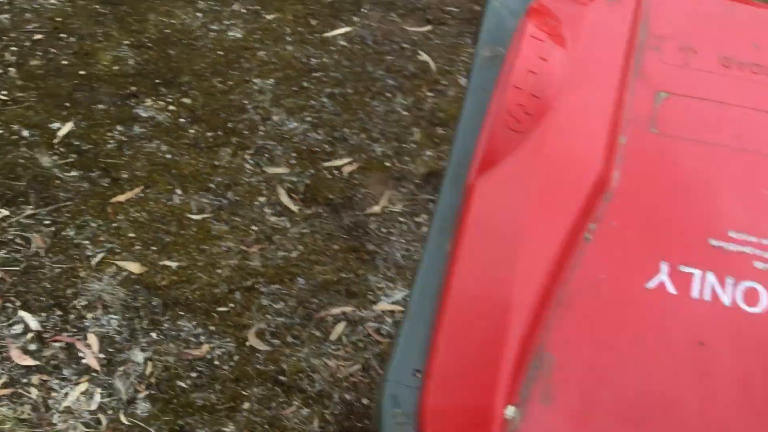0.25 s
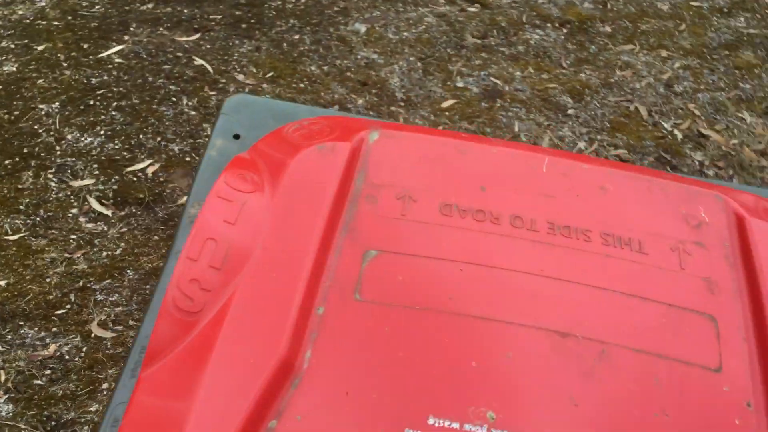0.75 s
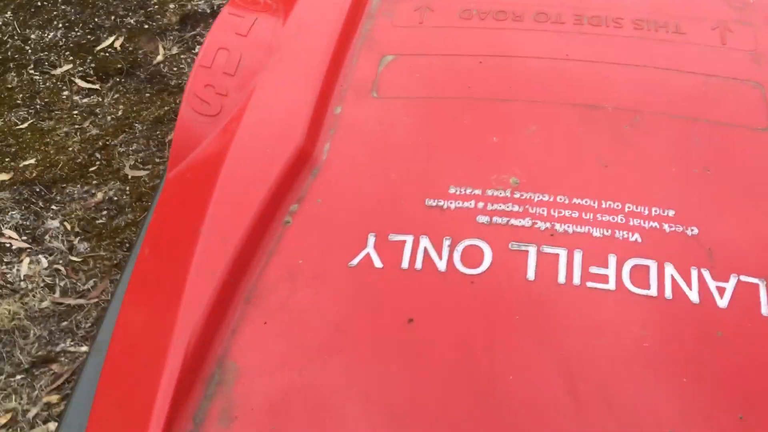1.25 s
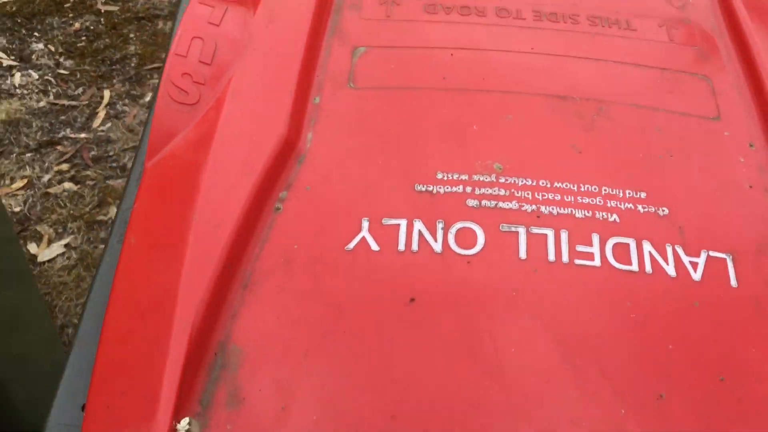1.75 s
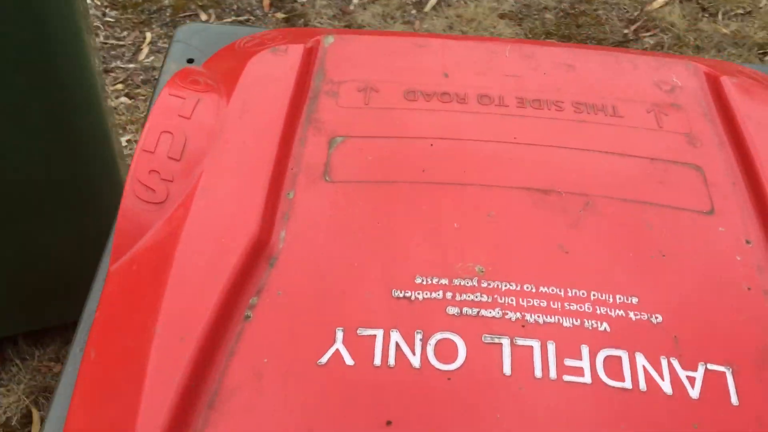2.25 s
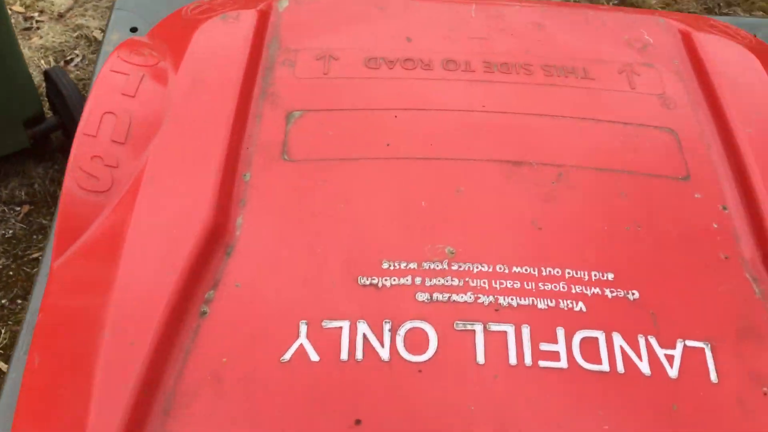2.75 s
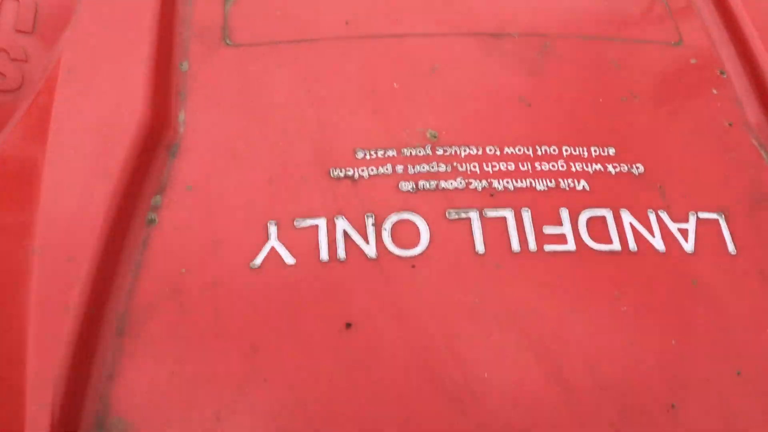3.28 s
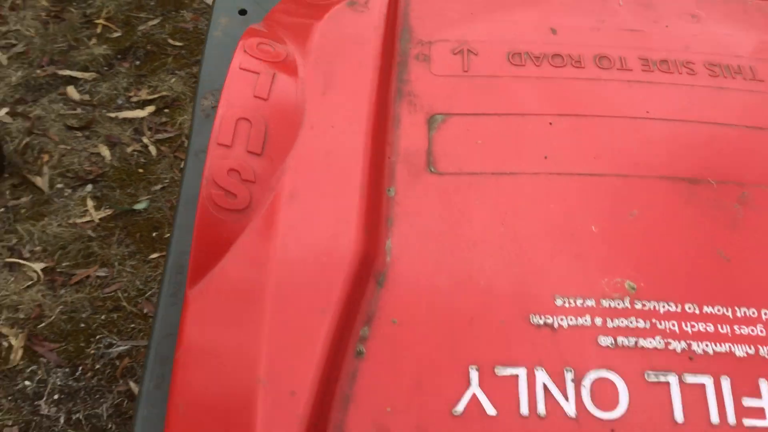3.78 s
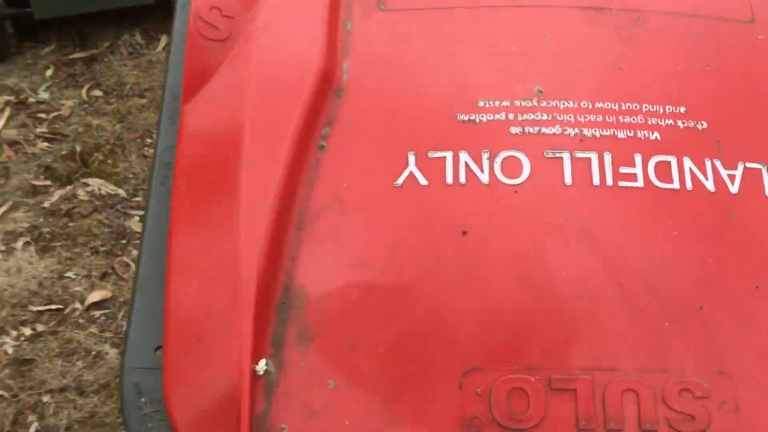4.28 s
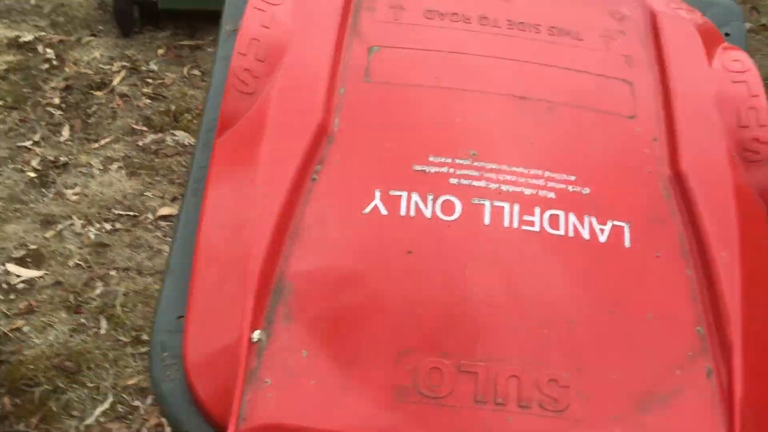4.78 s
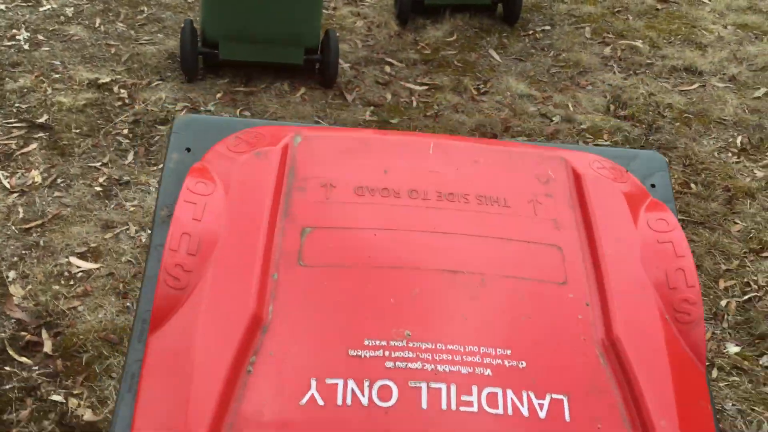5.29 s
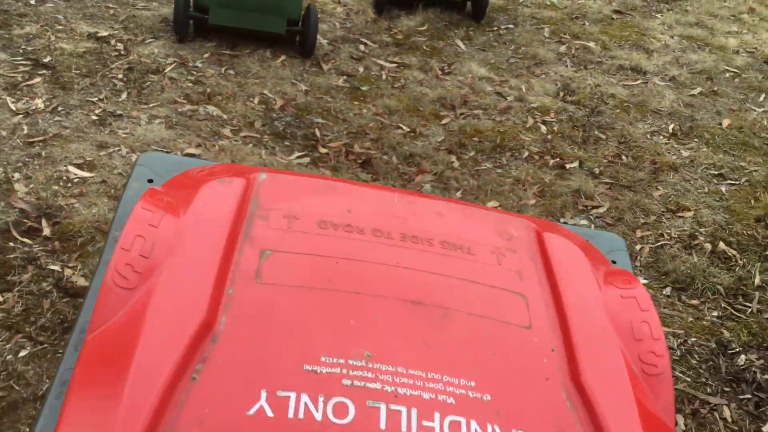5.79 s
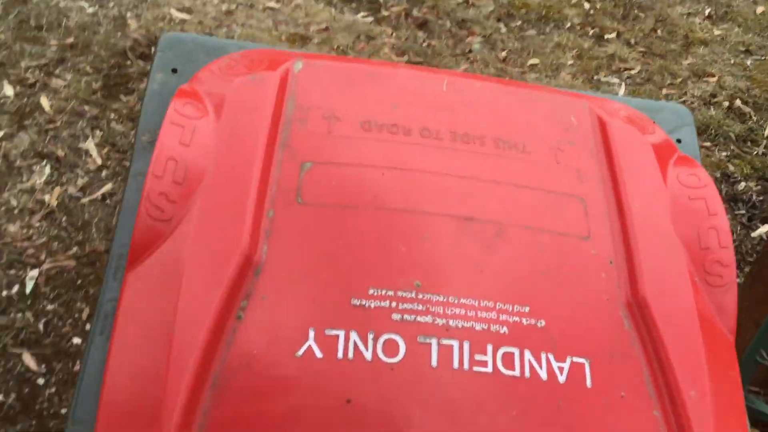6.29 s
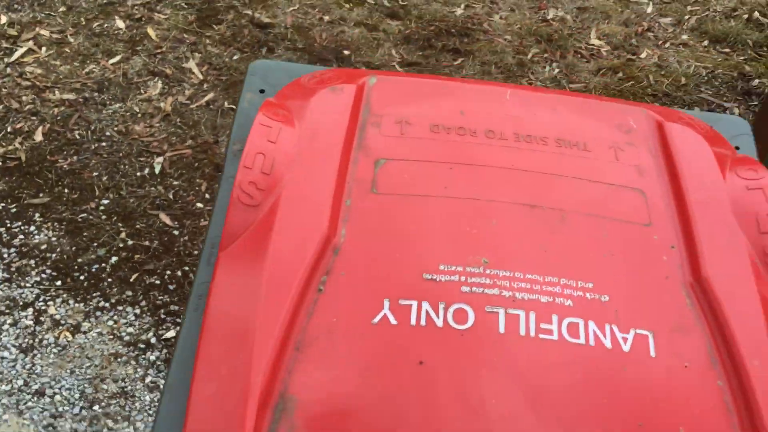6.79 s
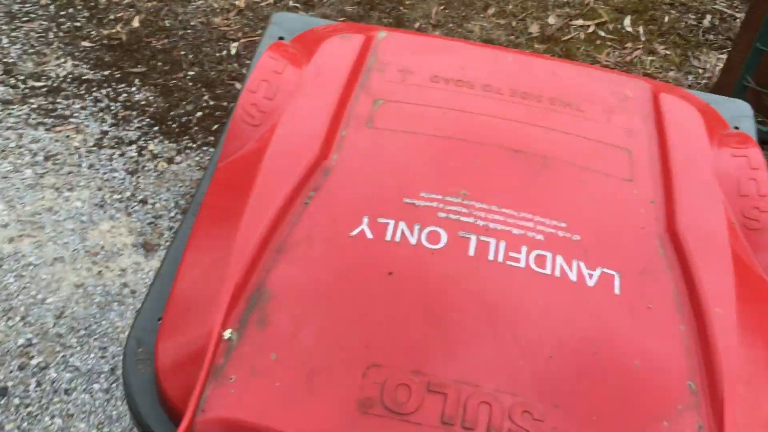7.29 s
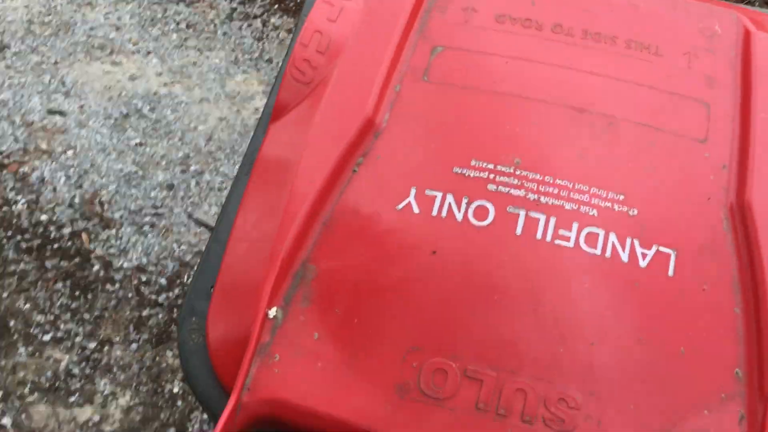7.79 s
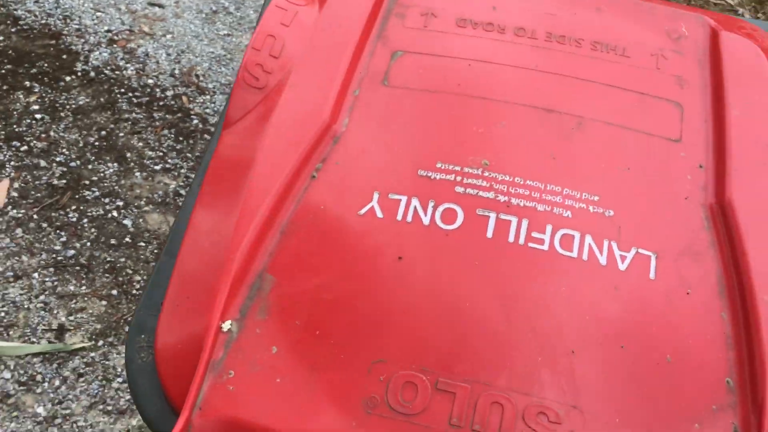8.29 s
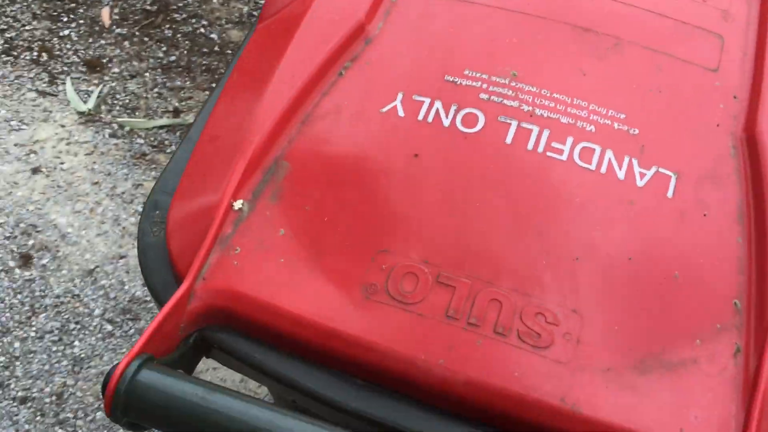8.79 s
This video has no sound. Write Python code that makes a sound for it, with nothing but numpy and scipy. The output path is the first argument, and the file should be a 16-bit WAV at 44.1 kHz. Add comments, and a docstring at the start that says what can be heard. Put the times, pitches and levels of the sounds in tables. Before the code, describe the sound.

A hollow plastic wheelie bin is pulled along outdoors, heard closely from above its lid, dry and without echo over faint low air. From 0 to 1.2 seconds it drums softly over lumpy grass, with irregular low thuds, a muffled rattle and a short leaf crackle. A very loud, sharp knock, like a fast falling chirp, hits at 1.3, followed by others near 2.2, 3.1, 4.0 and 4.3. Jolts cluster from 3.0 to 3.8; then it eases briefly. From about 4.8 the ground hardens: softer double knocks, twig flicks, leaf rustle, and the first crunching stones, one clear near 5.6. From 6.5 to 7.1 comes a heavy, booming, rattling surge with a bright gravel crush at 6.9. A short lull around 7.5 leads into steady gravel crunch, ticking pebbles and hollow booms, with knocks at 8.0, 8.6 and 8.8, still rolling at 9.

```python
"""Hollow drumming and a soft rattle come first: a plastic wheelie bin pulled over lumpy grass, heard from above its lid.
Small random impacts ring the body, panels, walls and wheels; jolts add bursts of them and deep thuds.
Patches of dry leaves crackle, soft low booms swell as wavering tones, and twigs and stones flick the lid.
Sharp knocks on the plastic arrive as very fast falling chirps.
As gravel takes over, the crunch grows, single pebbles tick and clumps of stones give way, over quiet outdoor air."""
import sys
import numpy as np
from scipy import signal
from scipy.fft import rfft, irfft, next_fast_len
from scipy.io import wavfile
from scipy.ndimage import map_coordinates

SR = 44100
rng = np.random.default_rng(int(sys.argv[2]) if len(sys.argv) > 2 else 0)


def generate_wav(sig):
    """Save sig (samples, or channels by samples) to the path in sys.argv[1] as 16-bit PCM at SR."""
    pcm = np.round(np.clip(np.atleast_2d(sig).T, -1, 1) * 32767).astype(np.int16)
    wavfile.write(sys.argv[1], SR, pcm)


N = 399105  # length in samples, about 9 s


def amp(db):
    """Turn decibels into gain."""
    return 10 ** (np.asarray(db) / 20)


def unit(x):
    """Scale x to an rms of 1."""
    return x / np.sqrt(np.mean(x ** 2) + 1e-20)


def along(points, hz):
    """Read a curve of (frequency, value) points on a log frequency axis."""
    point_hz, value = np.transpose(points)
    return np.interp(np.log(hz + 1), np.log(point_hz + 1), value)


def wobble(rate):
    """Draw a smooth random curve with this many knots a second."""
    knots = rng.standard_normal(int(N * rate / SR) + 4)
    return map_coordinates(knots, [np.arange(N) * rate / SR])


def causal(gain):
    """Give a gain curve the phase of an object that rings only after it is struck (minimum phase)."""
    cepstrum = irfft(np.log(np.maximum(gain, 1e-6)))
    half = len(cepstrum) // 2
    # fold the part before time zero onto the part after it
    cepstrum[1:half] *= 2
    cepstrum[half + 1:] = 0
    return np.exp(rfft(cepstrum))


def ring(bed, modes, size=16384):
    """Make an impulse response of energy 1: resonances standing on a smooth bed."""
    hz = np.fft.rfftfreq(size, 1 / SR)
    power = amp(along(bed, hz)) ** 2
    for centre_hz, width_hz, db in modes:
        peak = amp(db) / (1 + ((hz - centre_hz) / width_hz) ** 2)
        power = power + peak ** 2
    response = irfft(causal(np.sqrt(power)))
    return response / np.linalg.norm(response)


def through(drive, response):
    """Let a driving signal ring an object."""
    return signal.fftconvolve(drive, response)[:N]


def contacts(rate, spread_db):
    """Scatter tiny random impacts of uneven size, about rate a second, at rms 1."""
    struck = rng.random(N) < rate / SR
    sizes = amp(spread_db * np.clip(rng.standard_normal(N), -2, 2))
    return unit(struck * sizes * rng.choice([-1, 1], N))


# A wheel drops off a lump or a stone; each layer shifts its own level and scales the settling time.
# Columns: start_s, drumming_db, rattle_db, crunch_db, settling_s (time to fall 60 dB)
JOLTS = [(0.002, -29, -61, -84, 0.12), (0.071, -27.5, -71, -90, 0.072), (0.276, -33.5, -51, -88, 0.24),
         (0.314, -22.5, -47.5, -70, 0.24), (0.362, -31, -53.5, -77, 0.98), (0.49, -24.5, -59, -84, 0.14),
         (0.54, -23.5, -44.5, -73, 0.27), (0.702, -23, -38, -65, 0.4), (0.871, -26, -51.5, -81, 0.35),
         (1.05, -28, -54, -86, 0.17), (1.154, -25.5, -71, -91, 0.42), (1.264, -27, -45.5, -71, 0.045),
         (1.421, -23, -49.5, -81.5, 0.43), (1.547, -22, -41, -68, 0.27), (1.682, -26.5, -49.5, -82.5, 0.74),
         (1.595, -28.5, -53.5, -70, 0.16), (1.764, -36, -45.5, -70, 0.52), (2.056, -35, -54, -80, 0.84),
         (2.241, -30, -59, -78, 0.13), (2.376, -27.5, -54.5, -87, 0.24), (2.437, -23, -47.5, -71, 0.24),
         (2.667, -28, -48.5, -71, 0.17), (2.761, -23, -42, -73, 0.4), (2.907, -29, -53, -85, 0.19),
         (3.056, -20.5, -46, -76, 0.18), (3.145, -23.5, -66, -90, 0.2), (3.203, -27, -49, -76, 0.36),
         (3.246, -23.5, -41.5, -65.5, 0.23), (3.274, -21, -56, -74, 0.2), (3.381, -22.5, -38, -67.5, 0.22),
         (3.408, -25.5, -46.5, -71, 0.21), (3.454, -29, -45, -75, 0.28), (3.495, -32, -40, -70, 0.17),
         (3.599, -24, -53.5, -74.5, 0.18), (3.748, -25, -39, -66.5, 0.26), (3.799, -21.5, -46, -68.5, 0.22),
         (4.417, -28, -65, -98.5, 0.059), (4.655, -30.5, -56, -72, 0.13), (4.77, -36, -53, -78, 0.15),
         (4.841, -30, -48, -56.5, 0.25), (4.899, -26, -45.5, -60, 0.37), (4.936, -17, -41, -60, 0.16),
         (5.088, -25, -43.5, -71, 0.57), (5.302, -27, -41, -52, 0.47), (5.343, -24, -43.5, -55, 0.46),
         (5.529, -27, -38.5, -56, 0.18), (5.584, -36, -42, -64, 0.55), (5.62, -28, -37, -46, 0.33),
         (5.748, -25, -42, -63, 0.1), (5.764, -27, -38, -62, 0.12), (5.868, -16.5, -38.5, -53, 0.13),
         (5.891, -25, -35.5, -56, 0.34), (6.054, -30, -42.5, -61.5, 0.31), (6.149, -26, -41.5, -61, 0.26),
         (6.434, -29, -64, -74, 0.43), (6.553, -16.5, -36, -53.5, 0.19), (6.596, -18.5, -29.5, -46.5, 0.58),
         (6.665, -19.5, -32.5, -53, 0.23), (6.759, -16.5, -38.5, -57, 0.88), (6.819, -22, -35, -52.5, 0.92),
         (6.898, -29.5, -31.5, -40.5, 0.46), (7.002, -29.5, -37, -55, 0.66),
         (7.152, -25.5, -49.5, -61.5, 0.47), (7.241, -23, -40.5, -52, 0.29), (7.271, -20.5, -41, -57, 0.58),
         (7.376, -14.5, -42, -62, 0.12), (7.542, -22, -41, -54, 0.34), (7.772, -29, -42, -59.5, 0.44),
         (7.789, -20.5, -39.5, -58, 0.6), (8.085, -27, -41.5, -62, 0.25), (8.177, -45, -41, -70, 0.24),
         (8.244, -22, -42.5, -61, 0.64), (8.328, -21.5, -34, -52.5, 0.86), (8.42, -24.5, -40, -55.5, 0.52),
         (8.486, -22.5, -33, -49, 0.38), (8.651, -23.5, -40, -59.5, 0.46), (8.737, -21, -41, -77, 1),
         (8.834, -35, -41, -57, 0.27), (8.86, -29, -34.5, -55, 0.3), (8.915, -22, -36.5, -63, 0.49),
         (8.985, -28.5, -43, -79, 0.98)]
JOLT_HOLD_S = 0.0058  # a jolt stays at full strength this long before it settles


def force(rolling_db, jolt_db, linger, flutter_db):
    """Contact strength: uneven rolling plus a burst at every jolt; linger scales its settling time."""
    t = np.arange(SR // 2) / SR
    steady = amp(rolling_db + flutter_db * wobble(45))
    settling_s = np.maximum(t - JOLT_HOLD_S, 0)
    jolt_power = np.zeros(N + SR)
    for (start_s, *_, t60), db in zip(JOLTS, jolt_db):
        burst_gain = amp(db - 60 * settling_s / (linger * t60))
        jolt_power[max(round(start_s * SR), 0):][:len(t)] += burst_gain ** 2
    return np.sqrt(steady ** 2 + jolt_power[:N])


# How hard the bin is hauled along; each layer turns this into its own level.
# Columns: time_s, effort_db
EFFORT = [(0, -57.5), (0.22, -53), (0.45, -44), (1.2, -42), (1.37, -52.5), (1.82, -31.5), (2.0, -46),
          (2.15, -42), (2.32, -46.5), (2.48, -44.5), (2.62, -47), (2.85, -38.5), (3.05, -46.5), (3.42, -28),
          (3.68, -47.5), (3.9, -41), (4.04, -46), (4.18, -48.5), (4.37, -50), (4.48, -55), (4.58, -48.5),
          (4.8, -46), (5.04, -32), (5.26, -55), (5.42, -36.5), (5.9, -33), (6.2, -39), (6.3, -42),
          (6.42, -37), (6.7, -28), (7.12, -33.5), (7.4, -40), (7.51, -57), (7.6, -45), (7.73, -41),
          (7.86, -39), (8.0, -37), (8.2, -36), (8.45, -37), (9.04, -36.5)]
# Soft grass gives way to gravel.
# Columns: time_s, hardness (0 to 1, no unit)
GROUND = [(0, 0), (4.6, 0.4), (5.4, 0.75), (6.6, 0.99), (9, 1)]
STROLL_DB = -40.5  # the effort of an easy pull


def pull():
    """Follow the pull: effort in dB above an easy pull, and hardness of the ground from 0 to 1."""
    t = np.arange(N) / SR
    extra_db = np.interp(t, *np.transpose(EFFORT)) - STROLL_DB
    hardness = np.clip(np.interp(t, *np.transpose(GROUND)), 0, 1)
    return extra_db, hardness


# Deep resonances of the hollow body, relative levels.
# Columns: pitch_hz, width_hz, level_db
BODY = [(73.4, 10, -5), (112.4, 10, 8), (159.6, 44.3, -1)]
# Smooth response beneath them, relative levels.
# Columns: frequency_hz, level_db
BODY_BED = [(15, -67), (30, -46.5), (45, -23.5), (65, -0.5), (120, -8), (200, -12), (400, -40),
            (1200, -82.5), (4000, -115)]
RUMBLE_GROWS, RUMBLE_GRAVEL_DB = 0.62, -4  # growth (dB per dB of effort), gain on gravel (dB)


def drumming(jolt_drum_db=-12, drum_db=-2.5):
    """Lumps strike the wheels and drum the hollow body, which rumbles on even at an easy pull."""
    extra_db, hardness = pull()
    rumble_db = STROLL_DB + drum_db + RUMBLE_GRAVEL_DB * hardness + RUMBLE_GROWS * extra_db
    drop_db = np.transpose(JOLTS)[1] + jolt_drum_db
    strength = force(rumble_db, drop_db, linger=0.9, flutter_db=1.5)
    lumps = contacts(rate=160, spread_db=2.0) * strength
    return through(lumps, ring(BODY_BED, BODY))


# Resonances of the flat side panels, relative levels.
# Columns: pitch_hz, width_hz, level_db
PANELS = [(241.6, 18, 0.5), (272.4, 15, 4), (319, 7.3, 0), (376.3, 39, -11.5)]
# Smooth response beneath them, relative levels.
# Columns: frequency_hz, level_db
PANEL_BED = [(60, -38.5), (180, -13), (280, -4.5), (400, -17.5), (600, -26.5), (1200, -72.5), (4000, -115)]


def flexing_panels(jolt_panel_db=-15, panel_db=-47, panel_grows=1.13):
    """Lumps flex the side panels, which speak up mainly when the bin is hauled hard."""
    extra_db, _ = pull()
    drop_db = np.transpose(JOLTS)[1] + jolt_panel_db
    strength = force(panel_db + panel_grows * extra_db, drop_db, linger=1.0, flutter_db=2.0)
    flexes = contacts(rate=200, spread_db=2.5) * strength
    return through(flexes, ring(PANEL_BED, PANELS))


# Resonances of the walls and the air between them, relative levels.
# Columns: pitch_hz, width_hz, level_db
WALLS = [(387, 30, 0), (467.7, 18, 7.5), (542, 25, 4), (620.7, 8.8, 7.5), (677.3, 12, 6.5), (766, 26, 6),
         (848, 20, 0.5), (930, 24, -8.5), (1040, 8.2, 2), (1102, 2.4, 5), (1144, 5.2, 2.5), (1212, 16, 1),
         (1325, 15, -2), (1350, 3.7, -9.5), (1480, 53, -11.5), (1770, 44, -16), (1940, 15, -12.5)]
# Smooth response beneath them, relative levels.
# Columns: frequency_hz, level_db
WALL_BED = [(200, -45), (380, -9), (520, -9), (800, -8), (1400, -7.5), (1650, -33), (2200, -29),
            (3500, -47), (7000, -82.5), (14000, -115)]
# level on grass at an easy pull (dB), gain on gravel (dB), growth (dB per dB of effort)
RATTLE_DB, RATTLE_GRAVEL_DB, RATTLE_GROWS = -59, 1.5, 1


def rattle(jolt_rattle_db=-1):
    """Stones rattle the walls; soft ground lengthens each contact and so dulls the sound."""
    extra_db, hardness = pull()
    rattle_db = RATTLE_DB + RATTLE_GRAVEL_DB * hardness + RATTLE_GROWS * extra_db
    shake_db = np.transpose(JOLTS)[2] + jolt_rattle_db
    sharp = contacts(rate=900, spread_db=4.0)
    soft = signal.lfilter(*signal.butter(1, 420, fs=SR), sharp)
    mixed = hardness * sharp + 1.47 * (1 - hardness) * soft
    stones = mixed * force(rattle_db, shake_db, linger=0.79, flutter_db=2.5)
    return through(stones, ring(WALL_BED, WALLS))


def pebbles(strength, rate=70, level_db=10, centre_hz=2300, spread_octaves=0.42, spread_db=4.0, cycles=13):
    """Single stones and twigs tick, each at its own pitch and as hard as the wheel presses."""
    t = np.arange(SR // 60) / SR
    at = np.flatnonzero(rng.random(N) < rate / SR)
    pitch, size = np.clip(rng.standard_normal((N, 2))[at], -2, 2).T[:, :, None]
    hz = centre_hz * 2 ** (spread_octaves * pitch)
    # lower pitches tick louder
    gain = strength[at, None] * amp(level_db + spread_db * size) * centre_hz / hz
    # each tick falls by 60 dB in the given number of cycles
    envelope = amp(-60 * hz * t / cycles) * (1 - np.exp(-hz * t))
    ticks = gain * np.sin(2 * np.pi * hz * t) * envelope
    positions = at[:, None] + np.arange(len(t))
    return np.bincount(positions.ravel(), ticks.ravel(), N)[:N]


# Resonances of the wheels and axle, relative levels.
# Columns: pitch_hz, width_hz, level_db
WHEELS = [(2240, 46, -8.5), (2780, 43, -6.5), (2940, 23, -14.5), (3410, 8.2, -0.5), (3600, 36, -6.5)]
# Smooth response beneath them, relative levels.
# Columns: frequency_hz, level_db
GRIT_BED = [(700, -33.5), (1500, 6.5), (2200, -1.5), (3100, -8.5), (3900, -11.5), (4700, -21), (5600, -32),
            (9000, -52.5), (16000, -58.5)]
# level on grass at an easy pull (dB), gain on gravel (dB), growth (dB per dB of effort)
CRUNCH_DB, CRUNCH_GRAVEL_DB, CRUNCH_GROWS = -90.5, 18.5, 0.89


def crunch(jolt_crunch_db=-1, clump_db=4.0):
    """Grit gives way in clumps under the wheels, and single pebbles tick out of the dense crunch."""
    extra_db, hardness = pull()
    crunch_db = CRUNCH_DB + CRUNCH_GRAVEL_DB * hardness + CRUNCH_GROWS * extra_db
    crush_db = np.transpose(JOLTS)[3] + jolt_crunch_db
    pressure = force(crunch_db, crush_db, linger=0.48, flutter_db=5.0)
    clumps = unit(amp(clump_db * hardness * wobble(70)))
    grit = clumps * contacts(rate=6000, spread_db=1.5) * pressure
    return pebbles(pressure) + through(grit, ring(GRIT_BED, WHEELS))


# Tone of still outdoor air, relative levels.
# Columns: frequency_hz, level_db
AIR = [(18, -46), (30, -16.5), (45, -4.5), (93, 1.5), (266, -22), (512, -26.5), (760, -25), (962, -40.5),
       (1250, -40), (1630, -36), (13700, -56.5), (16000, -82)]


def air(level_db=-60):
    """Quiet outdoor air with a faint hiss, made of shaped noise."""
    return amp(level_db) * through(rng.standard_normal(N), ring(AIR, []))


def thuds(level_db=-11):
    """The drop of a wheel gives the hollow body one solid push."""
    pushes = np.zeros(N)
    for start_s, db, *_ in JOLTS:
        pushes[max(round(start_s * SR), 0)] = amp(db + level_db)
    body = ring(BODY_BED, BODY)
    return through(pushes, body / np.abs(body).max())


# A tyre ploughs through a patch of dry leaves.
# Columns: loudest_s, length_s, level_db (at the loudest moment, before flutter)
LEAVES = [(0.355, 0.058, -66.5), (1.21, 0.029, -76), (1.336, 0.073, -72.5), (1.917, 0.17, -66),
          (2.586, 0.36, -77.5), (2.962, 0.24, -78.5), (4.721, 0.051, -69), (4.88, 0.037, -65),
          (5.07, 0.066, -71), (5.16, 0.034, -63), (5.378, 0.25, -67), (5.674, 0.11, -50),
          (6.139, 0.2, -68.5), (6.427, 0.46, -79)]
# Tone of their rustle, relative levels.
# Columns: frequency_hz, level_db
LEAF_BED = [(700, -27), (1500, 4.5), (2500, 4.5), (3600, -0.5), (4700, -11.5), (5800, -28.5), (9000, -37.5),
            (16000, -43.5)]


def leaves(level_db=0, edge_db=8, flutter_db=2.0):
    """Crackling swells and fades as a tyre crosses each patch, edge_db lower at its rims."""
    t = np.arange(N) / SR
    swell = sum(amp(db - edge_db * np.abs(t - loudest_s) / (length_s / 2))
                for loudest_s, length_s, db in LEAVES)
    flutter = amp(level_db + flutter_db * wobble(90))
    crackle = contacts(rate=2000, spread_db=1.0) * swell * flutter
    return through(crackle, ring(LEAF_BED, []))


# Soft low booms: deep thumps of handling or wind, the hollow body, and single panels.
# Columns: start_s, level_db (peak, before level_db below is added), pitch_hz (before it wavers)
BOOMS = [(0.36, -34, 50), (0.413, -33, 68), (0.536, -29.5, 271), (0.71, -33.5, 472), (0.717, -30, 112),
         (0.87, -33.5, 248.5), (1.42, -28, 271), (1.688, -29, 106.4), (1.769, -29, 252), (1.827, -36, 273),
         (2.057, -35.5, 255), (2.242, -31, 113.5), (2.429, -40, 268), (2.905, -45, 242),
         (2.935, -30.5, 190), (3.247, -33, 112), (3.25, -26, 269), (3.391, -27.5, 262), (3.47, -40, 105),
         (3.493, -25, 282), (3.6, -31.5, 265), (3.754, -26, 267), (3.765, -47, 476), (4.105, -39.5, 269),
         (4.655, -39.5, 293.5), (4.935, -28.5, 88.5), (5.0, -29.5, 282), (5.031, -33, 117),
         (5.345, -30.5, 263), (5.448, -33, 111), (5.589, -28.5, 276), (5.605, -35, 381),
         (5.832, -30.5, 296), (5.889, -22.5, 252), (5.898, -30, 94), (6.062, -30.5, 114),
         (6.156, -35.5, 262), (6.558, -25.5, 248), (6.615, -25, 240.5), (6.625, -23.5, 112.4),
         (6.761, -22.5, 116), (6.774, -23, 281.4), (6.821, -33, 116), (6.903, -25.5, 85),
         (6.913, -38.5, 252), (7.015, -26.5, 252), (7.067, -25, 268), (7.154, -29, 265),
         (7.281, -31.5, 276), (7.363, -36, 115), (7.559, -26.5, 116), (7.791, -25.5, 263),
         (7.812, -42, 120), (8.002, -30.5, 255), (8.27, -26.5, 110.5), (8.327, -30, 107.5),
         (8.42, -30.5, 257), (8.427, -21, 112), (8.486, -26.5, 274), (8.496, -24.5, 112), (8.652, -29, 115),
         (8.709, -27, 120), (8.864, -22.5, 103.4), (8.869, -29.5, 271), (8.917, -22.5, 118),
         (8.922, -43, 246)]


def booms(level_db=-1.5, attack_s=0.0071, t60=0.14, waver=0.49):
    """Each soft boom is one tone that swells briefly and dies away, wavering slightly in pitch."""
    out = np.zeros(N + SR)
    t = np.arange(SR // 4) / SR
    swell = (1 - np.exp(-t / attack_s)) * amp(-60 * t / t60)
    swell = swell / swell.max()
    drift = wobble(70)
    for start_s, db, hz in BOOMS:
        start = round(start_s * SR)
        # waver is a phase shift in radians
        phase = 2 * np.pi * hz * t + waver * np.roll(drift, -start)[:len(t)]
        out[start:][:len(t)] += amp(db + level_db) * swell * np.sin(phase)
    return out[:N]


def burst(t, hz, sharpness, t60):
    """Dying noise in one broad resonance, peak 1."""
    resonance = signal.iirpeak(np.clip(hz, 100, SR / 4), max(sharpness, 1), fs=SR)
    dying_noise = rng.standard_normal(len(t)) * amp(-60 * t / t60)
    noise = signal.lfilter(*resonance, dying_noise)
    return noise / np.abs(noise).max()


# Twigs and stones flick against the lid; levels are shifted by the settings below.
# Columns: start_s, level_db, pitch_hz, lid_ring_db (relative to the crack), lid_pitch_hz,
# click_db (relative to the crack)
SNAPS = [(0.6893, -48, 1900, -3, 520, -11.5), (1.1026, -44.5, 2550, 20.5, 720, -13),
         (1.275, -61, 2590, 8, 700, -12), (1.368, -60, 2910, 0, 650, -15),
         (4.1805, -53, 2280, 10.5, 650, -33), (4.2218, -46.5, 3750, 15.5, 560, -27),
         (5.049, -57, 2800, 2, 650, -8), (5.0933, -44, 2900, 12, 650, -7), (5.3606, -41, 2300, 0, 650, -24),
         (6.097, -53, 3000, 5, 650, -10), (6.2575, -43.5, 2000, 11, 650, -20),
         (6.2707, -47.5, 2600, 8, 650, -3), (7.1159, -45, 1500, 26, 650, -37),
         (7.1304, -52, 2380, 1, 650, -6), (8.045, -38, 2300, 7, 650, -7)]


def snaps(t60=0.018, level_db=-1, dull_hz=4100, lid_db=-5, lid_t60=0.007, click_db=-1, click_t60=0.0076):
    """A twig or stone gives a bright click, a short crack around its own pitch, and a dull tap on the lid."""
    out = np.zeros(N + SR)
    t = np.arange(SR // 10) / SR
    plastic = signal.butter(6, dull_hz, fs=SR, output="sos")
    for start_s, db, hz, ring_db, lid_hz, bright_db in SNAPS:
        crack = burst(t, hz, sharpness=3.6, t60=t60)
        tap = np.sin(2 * np.pi * lid_hz * t) * (1 - np.exp(-lid_hz * t)) * amp(-60 * t / lid_t60)
        lid = amp(ring_db + lid_db) * tap / np.abs(tap).max()
        click = amp(bright_db + click_db) * burst(t, 4900, sharpness=1.8, t60=click_t60)
        # the plastic swallows the highs; only the click comes straight through the air
        snap = signal.sosfilt(plastic, crack + lid) + click
        out[round(start_s * SR):][:len(t)] += amp(db + level_db) * snap
    return out[:N]


# Sharp knocks on the plastic; each struck spot has a low and a high resonance.
# Columns: start_s, level_db (peak), hardness_db (treble, before crack_db below is added),
# lid_share (part reflected by the lid, no unit), low_hz, low_height_db, high_hz, high_height_db
KNOCKS = [(1.298, -3, -14.5, 0.024, 633, 2.5, 1740, 2), (2.196, -6, -15, 0.05, 195.6, 4.5, 1400, 5.5),
          (3.073, -11, -16.5, 0.019, 507, 3.5, 2980, 3.5), (3.994, -7, -21, 0.02, 646, 4, 3220, 5),
          (4.313, -9, -15.5, 0.27, 1250, 2, 2240, 4), (4.842, -17.5, -34, 0.064, 195, 8, 615, 7),
          (4.89, -13.5, -22, 0.1, 305, 6.5, 2850, 12), (7.112, -19, -43.5, 0.043, 210, 1, 650, 16.5),
          (8.037, -9, -14, 0.013, 400, 2.5, 5240, 4.5), (8.579, -14, -28.5, 0.29, 300, -1.5, 1390, -2),
          (8.807, -16.5, -22.5, 0.05, 253, 9.5, 2500, 1)]
# Smooth tone of a knock, relative levels.
# Columns: frequency_hz, level_db
KNOCK_TONE = [(15, -60.5), (30, -48), (50, -8), (70, 0), (110, 2), (200, 2), (400, -3), (800, -10),
              (1600, -17.5), (3000, -23.5), (5000, -36.5), (8000, -43), (15000, -51.5)]
LID_ECHO_S = 0.00081  # delay of a knock's reflection off the lid
SPOT_OCTAVES = 0.17  # half-width of a struck spot's resonances


def knocks(lag_cycles=.55, corner_hz=18, crack_db=11, size=8192):
    """Each knock disperses: frequencies lag by about the same part of a cycle, so the bass comes last."""
    out = np.zeros(N + SR)
    hz = np.fft.rfftfreq(size, 1 / SR)
    dispersion = np.exp(-2j * np.pi * lag_cycles * np.log(1 + hz / corner_hz))
    treble = along([(350, 0.054), (2500, 1.6), (9000, 1.6)], hz)  # a soft blow loses its highs first
    for start_s, db, hardness_db, share, low_hz, low_db, high_hz, high_db in KNOCKS:
        # each struck spot has its own random treble colour
        spot_db = 0.7 * map_coordinates(rng.standard_normal(size), [hz / 600])
        resonance_db = 0
        for spot_hz, height_db in ((low_hz, low_db), (high_hz, high_db)):
            octaves_away = np.log2((hz + 1) / spot_hz)
            resonance_db = resonance_db + height_db / (1 + (octaves_away / SPOT_OCTAVES) ** 2)
        treble_db = treble * (hardness_db + crack_db + spot_db)
        colour = amp(along(KNOCK_TONE, hz) + resonance_db + treble_db)
        reflection = 1 + share * np.exp(-2j * np.pi * hz * LID_ECHO_S)
        chirp = irfft(causal(colour) * dispersion * reflection)[:size // 2]
        out[round(start_s * SR):][:len(chirp)] += amp(db) * chirp / np.abs(chirp).max()
    return out[:N]


# A wheel crushes a clump of stones.
# Columns: start_s, level_db (before the attack and decay), decay_s (time to fall 60 dB),
# pitch_hz (ring of the stones), ring_height_db
CRUSHES = [(4.89, -43, 0.043, 2900, -2), (4.919, -54, 0.16, 2300, 2), (4.947, -55, 0.07, 1500, 3),
           (5.151, -52, 0.21, 1400, 2), (5.526, -46.5, 0.078, 2100, 6), (5.632, -34, 0.087, 3100, 7.5),
           (5.868, -45, 0.07, 1900, 2.5), (5.889, -52, 0.31, 1900, 6), (6.155, -50.5, 0.11, 1700, 3),
           (6.598, -34.5, 0.059, 2850, 3), (6.667, -48.5, 0.2, 2660, 3), (6.756, -39.5, 0.079, 2800, 8),
           (6.816, -37.5, 0.1, 2200, 6.5), (6.897, -24.5, 0.047, 2760, 7.5), (7.011, -46, 0.1, 2700, 3.5),
           (8.043, -34, 0.036, 2000, -2), (8.33, -42, 0.09, 2800, 2), (8.366, -51, 0.08, 3700, 3),
           (8.419, -51.5, 0.07, 2410, 1), (8.489, -46, 0.15, 1350, 0), (8.546, -43, 0.086, 2730, 5),
           (8.65, -50, 0.063, 2900, 6), (8.914, -45.5, 0.15, 1590, 4)]
# Tone of their crunch, relative levels.
# Columns: frequency_hz, level_db
CRUSH_BED = [(200, -24.5), (600, 5.5), (1500, 7.5), (2100, 0.5), (3300, -6), (4100, -17.5), (5200, -30.5),
             (7000, -46), (16000, -51.5)]


def crushes(level_db=0, attack_s=0.0031, width_hz=170):
    """A clump of stones gives way all at once: a dense crunch that rings at the pitch of its stones."""
    out = np.zeros(N + SR)
    t = np.arange(SR // 3) / SR
    grains = contacts(rate=5000, spread_db=4)
    for start_s, db, t60, hz, height_db in CRUSHES:
        start = round(start_s * SR)
        collapse = (1 - np.exp(-t / attack_s)) * amp(-60 * t / t60)
        drive = np.roll(grains, -start)[:len(t)] * collapse
        stones = ring(CRUSH_BED, [(hz, width_hz, height_db)], size=2048)
        out[start:][:len(t)] += amp(db + level_db) * signal.fftconvolve(drive, stones)[:len(t)]
    return out[:N]


def scene():
    """Add up every sound of the bin in the open, with no surroundings to answer it."""
    rolling = drumming() + flexing_panels() + rattle() + crunch()
    events = thuds() + leaves() + booms() + snaps() + knocks() + crushes()
    return (rolling + air() + events)[None]


TOP_HZ = 16850  # nothing is heard above this


def record(dry):
    """Fade the treble out over the last 600 Hz below the top frequency."""
    size = next_fast_len(N + SR // 2)
    passed = np.clip((TOP_HZ - np.fft.rfftfreq(size, 1 / SR)) / 600, 0, 1)
    return irfft(rfft(dry, size) * passed, size)[:, :N]


dry = scene()
out = record(dry)
generate_wav(out)
```